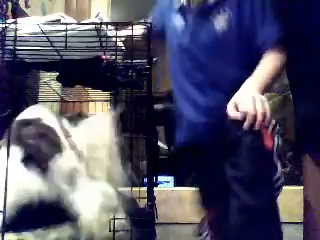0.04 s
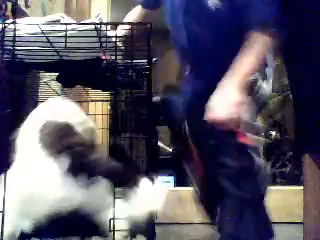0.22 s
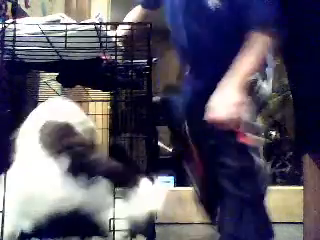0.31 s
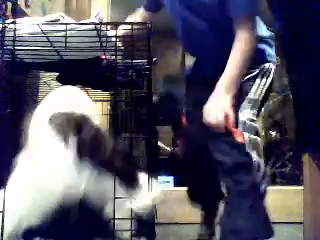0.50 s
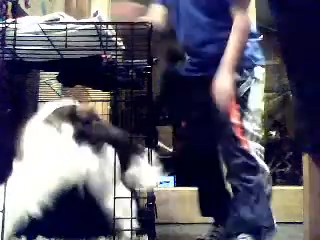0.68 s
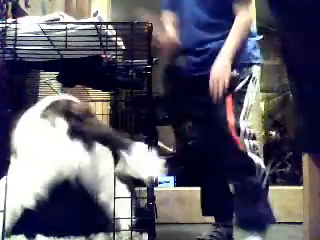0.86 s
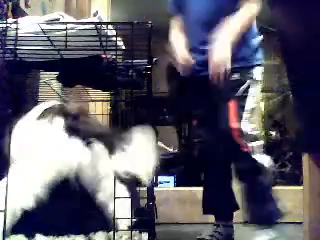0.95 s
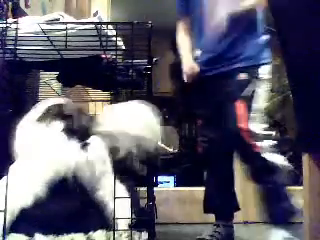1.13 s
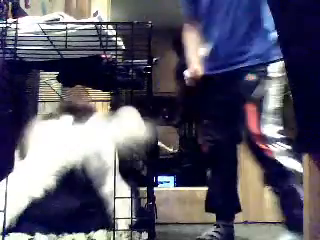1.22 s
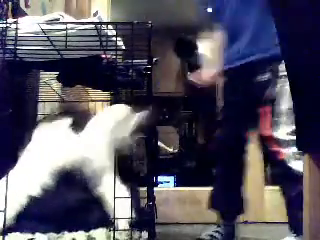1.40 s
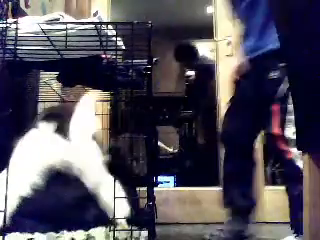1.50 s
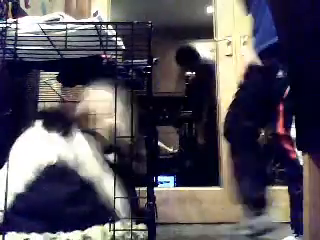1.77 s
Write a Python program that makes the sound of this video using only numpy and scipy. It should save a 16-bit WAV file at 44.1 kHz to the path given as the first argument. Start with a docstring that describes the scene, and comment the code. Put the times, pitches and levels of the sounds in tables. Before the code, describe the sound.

A wire dog crate rattles hard, rings metallically, then its door bangs and chatters indoors

```python
"""A dog thrashes in a wire crate in a living room: a knock, a hard rattle that sets one side ringing,
a lighter shake, then the door bangs and chatters. Small ticks and a rustle lie around this over a faint hum.
Wires, fur and air are coloured noise; the tray, frame, side panel, door and hum are sine modes.
A small microphone overloads on the loud moments and its noise suppressor turns their tails down."""
import sys
import numpy as np
from scipy import signal
from scipy.fft import rfft, irfft, next_fast_len
from scipy.io import wavfile
from scipy.ndimage import uniform_filter1d, map_coordinates

SR = 44100
rng = np.random.default_rng(int(sys.argv[2]) if len(sys.argv) > 2 else 0)


def transcribe(u):
    """Save the signal u as a 16-bit wav file named by the first command-line argument.

    u: samples, shape (n,) or (channels, n), limited to [-1, 1]; the rate is SR.
    q: integer samples, one column per channel.
    """
    v = np.clip(np.atleast_2d(u).T, -1, 1)
    q = np.round(v * 32767).astype(np.int16)
    wavfile.write(sys.argv[1], SR, q)


N = 79380

# spectrum of struck wires: freq_hz, level_db
WIRE_SPECTRUM = [(30, -19), (150, -18), (400, -5.5), (650, -3.5), (1100, -1), (1700, 0), (2600, -4),
                 (4200, -6.5), (6300, -13.5), (7500, -24), (9500, -55), (15000, -71)]


def amp(db):
    """Decibels to gain."""
    return 10 ** (np.asarray(db) / 20)


def unit(x):
    """Scale to rms 1."""
    return x / np.sqrt(np.mean(x ** 2) + 1e-20)


def clock():
    """The time of every sample, in seconds."""
    return np.arange(N) / SR


def along(points, hz):
    """Interpolate (Hz, value) points on a log frequency axis."""
    f, v = np.transpose(points)
    return np.interp(np.log(hz + 1), np.log(f + 1), v)


def wobble(knots_per_s):
    """A smooth random curve through normally distributed knots."""
    return map_coordinates(rng.standard_normal(N // 40), [clock() * knots_per_s], mode="wrap")


def colour(x, gain_db, size=4096):
    """Minimum-phase filter of unit energy; gain_db is a function of frequency."""
    cepstrum = irfft(np.log(amp(gain_db(np.fft.rfftfreq(size, 1 / SR))) + 1e-6))
    # fold onto positive time to make the filter causal
    cepstrum[1:size // 2] *= 2
    cepstrum[size // 2 + 1:] = 0
    h = irfft(np.exp(rfft(cepstrum)))
    return signal.fftconvolve(x, h / np.linalg.norm(h))[:len(x)]


def hump(centre_hz, octaves):
    """A broad resonance, as dB over frequency."""
    return lambda hz: -20 * np.log10(1 + (np.log2((hz + 1) / centre_hz) / octaves) ** 2 / 2)


def burst(t60_s, gain_db):
    """A coloured noise crack that starts near rms 1 and dies away exponentially."""
    fade = amp(-60 * clock()[:SR // 4] / t60_s)
    crack = colour(fade * rng.standard_normal(len(fade)), gain_db)
    return crack * np.linalg.norm(fade) / np.linalg.norm(crack)


def ring(modes):
    """Damped modes struck once, scaled to start near rms 1 after a short attack."""
    attack_s = .002
    t = clock()[:SR // 2]
    norm = np.sqrt(sum(amp(db) ** 2 for _, db, _ in modes) / 2)
    tone = 0
    for hz, db, t60_s in modes:
        tone = tone + amp(db - 60 * t / t60_s) * np.sin(2 * np.pi * (hz * t + rng.random()))
    return tone * (1 - np.exp(-t / attack_s)) / norm


def add(track, start_s, sound):
    """Mix a sound in at its start time."""
    part = track[round(start_s * SR):][:len(sound)]
    part += sound[:len(part)]


def contacts():
    """Two noises under one envelope of short contacts at uneven times; each near rms 1."""
    rate_per_s, t60_s = 1400, 0.024
    hits = (rng.random(N) < rate_per_s / SR).astype(float)
    energy = signal.lfilter([1], [1, -np.exp(-np.log(1e6) / (t60_s * SR))], hits)
    steady = np.abs(uniform_filter1d(energy, size=1100)) + 1e-9  # local mean evens out the density
    return np.sqrt(energy / steady) * rng.standard_normal((2, N))


def background():
    """Room air as coloured noise, with a faint hum of sines that waver in phase."""
    # air spectrum: freq_hz, level_db
    air_spectrum = [(25, -28), (60, -12.5), (165, -15), (208, -4), (276, -1.5), (340, -6.5), (615, -7),
                    (682, -8.5), (1200, -11), (1440, -11.5), (2130, -15), (3750, -15.5), (5820, -20.5),
                    (7100, -26.5), (7600, -43.5), (8600, -54), (12000, -66.5)]
    # hum tones: freq_hz, level_db (rms)
    hum_tones = [(285, -62.5), (1168, -52.5)]
    air_db, wander_rad = -40.5, 1.4
    t = clock()
    air = unit(colour(rng.standard_normal(N), lambda hz: along(air_spectrum, hz)))
    hum = 0
    for hz, db in hum_tones:
        hum = hum + amp(db) * np.sqrt(2) * np.sin(2 * np.pi * hz * t + wander_rad * wobble(14))
    return amp(air_db) * air + hum


def shuffling():
    """The dog turns round: ticks are short noise bursts, brushing is contact noise in smooth swells."""
    # light touches of paws and wires: start_s, level_db, centre_hz, width_octaves
    ticks = [(0.861, -28.5, 292, 0.34), (1.104, -29.5, 1100, 0.53), (1.113, -36, 1100, 0.88),
             (1.339, -31, 1500, 0.44), (1.344, -37, 1400, 0.37), (1.372, -30.5, 290, 0.18),
             (1.4365, -29, 1290, 0.41), (1.656, -33, 3900, 0.2), (1.785, -17.5, 438, 0.4),
             (1.7854, -30.5, 4360, .3), (1.787, -24.5, 3150, 0.15), (1.789, -44, 875, .3)]
    # fur and clothes brushing: peak_s, length_s, level_db, centre_hz
    rustles = [(0.019, .05, -45, 913), (0.627, 0.045, -47, 696), (1.106, 0.079, -44, 3400),
               (1.116, 0.053, -45, 1020), (1.308, 0.023, -58, 6000), (1.42, 0.054, -49.5, 3304)]
    tick_t60_s, rustle_octaves, lowpass_hz = 0.025, 0.16, 7200
    out = np.zeros(N)
    for start_s, db, hz, octaves in ticks:
        add(out, start_s, amp(db) * burst(tick_t60_s, hump(hz, octaves)))
    for peak_s, length_s, db, hz in rustles:
        swell = np.exp(-((clock() - peak_s) / length_s) ** 2)
        out += amp(db) * swell * unit(colour(contacts()[0], hump(hz, rustle_octaves)))
    return signal.sosfilt(signal.butter(8, lowpass_hz, fs=SR, output="sos"), out)


def blows():
    """Each blow cracks on a wire with its own pitch and thuds in the floor tray; a paw rings the frame."""
    # blows on the wires: start_s, level_db, tilt_db_per_octave, wire_hz, tray_thud_db
    strikes = [(0.0976, -19.5, -2.5, 885, -58), (0.108, -23.5, -3.5, 1230, -58),
               (0.113, -18, -8, 518.5, -33), (0.1208, -10.5, -1.5, 1588, -25.5),
               (0.2296, -12, 5.5, 1770, -48.5), (0.236, -13, 8, 1930, -46),
               (0.2404, -12.5, 4.5, 1820, -29.5), (0.2481, -12, 1.5, 2080, -40),
               (0.2564, -11, 6.5, 1620, -37), (.268, -12, 1, 2300, -27), (.278, -8.5, 0, 1030, -30),
               (0.4413, -13.5, -3.5, 1200, -48), (.4525, -15, -1, 890, -52.5), (0.483, -18, 0, 2320, -51),
               (0.5261, -16.5, 1.5, 1250, -55), (.5503, -15, -2, 1140, -48), (0.5563, -13.5, -3, 1180, -39),
               (0.684, -12, 8, 1700, -35), (0.6904, -0.5, -3.5, 3560, -9), (.695, -1, -4.5, 657, -2.5),
               (.714, -9, 0.5, 1100, -19), (0.727, -7.5, -2.5, 1600, -46), (0.748, -8, -9, 919, -25),
               (0.7811, -10, -4, 680, -31), (0.8, -11, -1, 3100, -47), (.836, -26, 6, 3400, -60)]
    # floor tray modes: freq_hz, level_db, t60_s
    tray_modes = [(87, -13.5, 0.097), (231, -5, 0.16), (262, 4.5, 0.057), (461, -2.5, .05),
                  (560.5, -2.5, .06)]
    # crate frame modes: freq_hz, level_db, t60_s
    frame_modes = [(250.4, 4, .07), (552, 2.5, 0.039), (900, -4, .035), (1135, -9.5, .035),
                   (1330, -6.5, .035), (1528, -7, .04), (1791, -1, 0.044)]
    crack_t60_s, peak_db, peak_octaves = 0.036, 9, 0.24
    frame_s, frame_db = .118, -11.5
    cracks, thuds = np.zeros(N), np.zeros(N)
    for start_s, db, tilt, wire_hz, thud_db in strikes:
        def crack_db(hz):
            """Wire spectrum, tilted, with a peak at the struck wire's pitch."""
            peak = peak_db * np.exp(-(np.log2((hz + 1) / wire_hz) / peak_octaves) ** 2 / 2)
            return along(WIRE_SPECTRUM, hz) + tilt * np.log2(1 + hz / 500) + peak
        add(cracks, start_s, amp(db) * burst(crack_t60_s, crack_db))
        add(thuds, start_s, amp(thud_db) * ring(tray_modes))
    add(thuds, frame_s, amp(frame_db) * ring(frame_modes))
    return cracks, thuds


def rattle():
    """The dog shakes the crate: wires clatter, the tray rumbles and a side panel sings in wavering modes."""
    # shaking: time_s, clatter_db, brightness_db, tray_rumble_db, panel_ring_db
    shake = [(0.203, -52.5, 12, -57, -78), (0.229, -37, 11, -45.5, -48), (0.239, -24, 11, -37.5, -50),
             (0.264, -16, 11.5, -34.5, -32), (.285, -12, 5, -26.5, -17), (.31, -9, 1.5, -19, -18),
             (0.329, -13, 0, -21, -5), (0.364, -12, -6.5, -28.5, -9.5), (0.387, -13.5, -1, -24.5, -17.5),
             (0.427, -18, 9.5, -44, -26), (0.454, -22, -10, -38.5, -53), (.468, -52, -4, -59.5, -64),
             (0.506, -46, 11, -67, -70), (0.529, -28, 9.5, -52.5, -54), (0.557, -22.5, 5, -35, -36),
             (0.575, -38, -8.5, -36, -24.5), (0.591, -58, -3, -46, -63)]
    # side panel modes: freq_hz, level_db
    panel_modes = [(664, -8.5), (774, -8.5), (821, -7.5), (850, 1), (958, -14.5), (1046, -9), (1125, -11),
                   (1222, -20.5), (1297, -17.5), (1416, -7.5), (1681, -8.5), (2068, -11.5), (2326, -17.5),
                   (2994, -20.5)]
    # clatter body spectrum: freq_hz, level_db
    body_spectrum = [(30, -26.5), (300, -19), (550, -5), (800, -2.5), (1150, 3.5), (1600, -4), (2500, -6.5),
                     (4000, -12), (7000, -29.5), (10000, -59.5)]
    # bright clatter spectrum: freq_hz, level_db
    jangle_spectrum = [(500, -39.5), (1000, -13.5), (1600, 4), (2200, 4.5), (3200, 0), (4500, -3),
                       (6500, -11.5), (7600, -20), (9500, -46.5), (15000, -65.5)]
    # tray rumble spectrum: freq_hz, level_db
    rumble_spectrum = [(25, -6.5), (110, -8.5), (160, -17), (220, -5.5), (272, 3.5), (320, -1.5),
                       (450, -13), (700, -2.5), (1500, -51)]
    jangle_db, flutter_db, wander_rad = -5.5, 2.5, .45
    t = clock()
    s, *columns = np.transpose(shake)
    wire_db, bright_db, tray_db, panel_db = [np.interp(t, s, c) for c in columns]
    low, high = contacts()
    body = unit(colour(low, lambda hz: along(body_spectrum, hz)))
    jangle = unit(colour(high, lambda hz: along(jangle_spectrum, hz)))
    tray = unit(colour(high, lambda hz: along(rumble_spectrum, hz)))
    panel = 0
    for hz, db in panel_modes:
        level = amp(db + flutter_db * wobble(45))
        phase = 2 * np.pi * (hz * t + rng.random()) + wander_rad * wobble(40)
        panel = panel + level * np.sin(phase)
    moving = (t > s[0]) & (t < s[-1])
    clatter = amp(wire_db) * (body + amp(jangle_db + bright_db) * jangle) + amp(tray_db) * tray
    return moving * clatter, moving * amp(panel_db) * unit(panel)


def door():
    """The slammed door rings in damped modes and chatters in its latch as fading contact noise."""
    # door modes: freq_hz, level_db, t60_s
    door_modes = [(622, 11, 0.098), (699, 3, 0.43), (810, 1.5, 0.31), (937, 4.5, 0.32), (1057.6, -4, 0.28),
                  (1440, -15, 0.3), (1518, -15, 0.27), (1618, 3.5, 0.25), (1773, -8.5, 0.15),
                  (1880, -3, 0.321), (2076, -25.5, 0.16), (3080, -8, 0.36), (3790, 1, 0.24)]
    slam_s, ring_db = .69, -8
    chatter_db, chatter_t60_s, chatter_end_s = -9.5, 0.63, .80
    tone, t = np.zeros(N), clock()
    add(tone, slam_s, amp(ring_db) * ring(door_modes))
    fade = amp(chatter_db - 60 * np.abs(t - slam_s) / chatter_t60_s)
    fade = fade * (t > slam_s) * (t < chatter_end_s)
    return fade * unit(colour(contacts()[0], lambda hz: along(WIRE_SPECTRUM, hz))), tone


def room(x):
    """The walls answer after 5 ms with a noise tail; each frequency dies at its own speed."""
    # reverberation: freq_hz, t60_s
    decay_times = [(100, 0.4), (500, 0.39), (2000, 0.3), (7000, 0.35)]
    hz, t, z = signal.stft(rng.standard_normal(SR // 2), SR, nperseg=256)
    fade = amp(-60 * t / along(decay_times, hz)[:, None])
    tail = signal.istft(z * fade, SR, nperseg=256)[1]
    return signal.fftconvolve(np.pad(x, (SR // 200, 0)), tail / np.linalg.norm(tail))[:N]


def scene():
    """The crate in its room; panel and door ring stay out of the echo."""
    room_db, thud_send_db, tick_send_db = -8, -8, 1  # sends are relative to the wires
    clatter, panel = rattle()
    chatter, door_ring = door()
    cracks, thuds = blows()
    wires, light = clatter + chatter + cracks, shuffling()
    echo = amp(room_db) * room(wires + amp(thud_send_db) * thuds + amp(tick_send_db) * light)
    return (wires + thuds + light + echo + panel + door_ring + background())[None]


def record(dry):
    """A noise suppressor turns quiet moments down, loud ones clip, and the top is cut off."""
    open_db, slope_db_per_db, depth_db, window_s = -9.5, 0.79, 14, 0.027
    clip_level, clip_hardness = 0.72, 9
    top_hz, edge_hz = 15830, 400
    power = np.abs(uniform_filter1d(dry ** 2, max(1, int(window_s * SR)), axis=-1))
    power_db = 10 * np.log10(power + 1e-12)
    x = dry * amp(np.clip(slope_db_per_db * (power_db - open_db), -depth_db, 0))
    x = x / (1 + np.abs(x / clip_level) ** clip_hardness) ** (1 / clip_hardness)
    m = next_fast_len(N + SR // 4)
    lowpass = np.clip((top_hz - np.fft.rfftfreq(m, 1 / SR)) / edge_hz + .5, 0, 1)
    return irfft(rfft(x, m) * lowpass, m)[..., :N]


dry = scene()
out = record(dry)
transcribe(out)
```